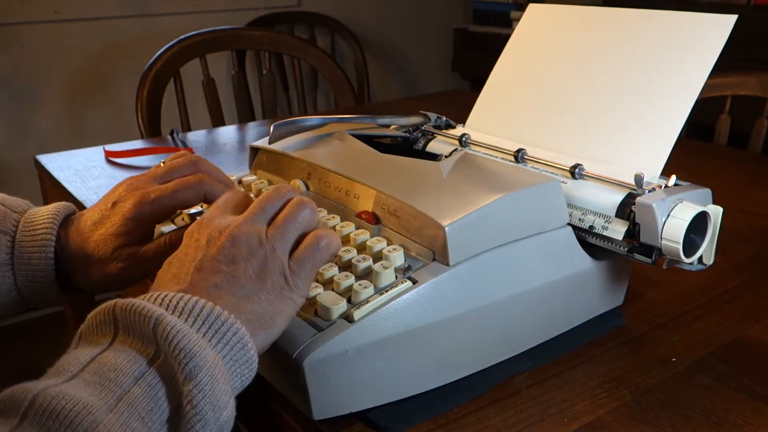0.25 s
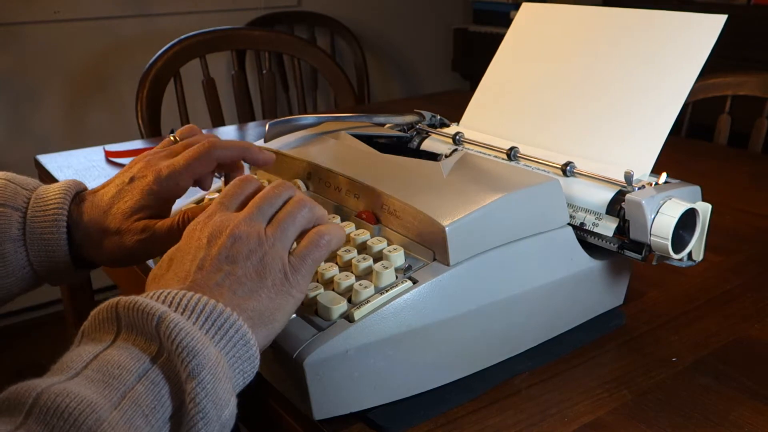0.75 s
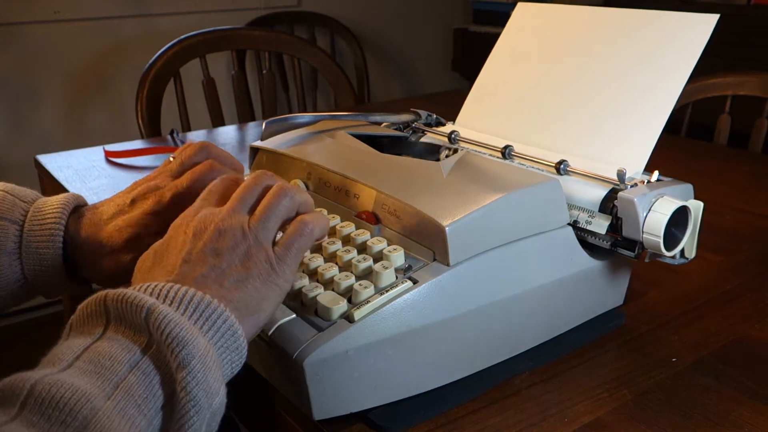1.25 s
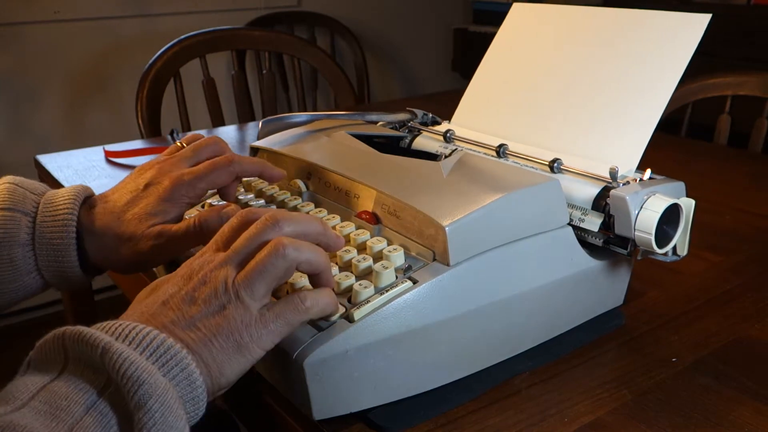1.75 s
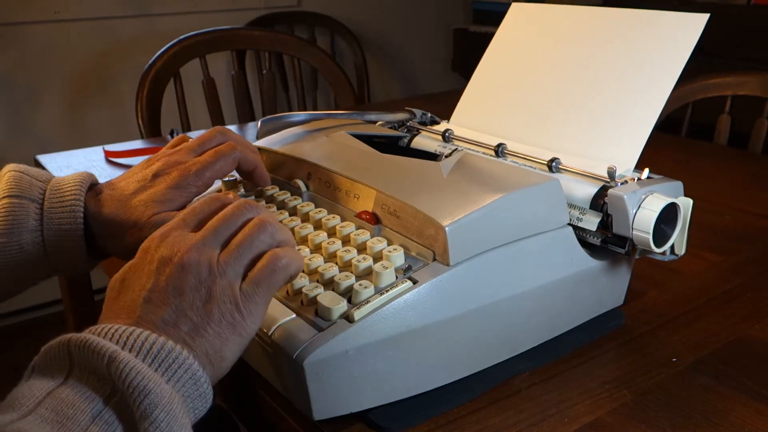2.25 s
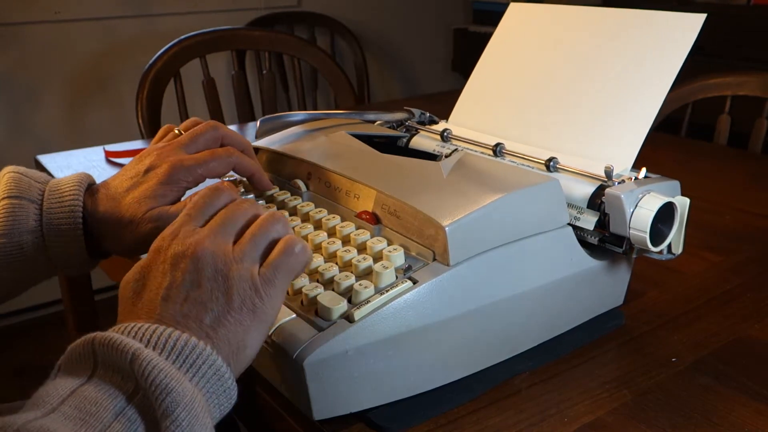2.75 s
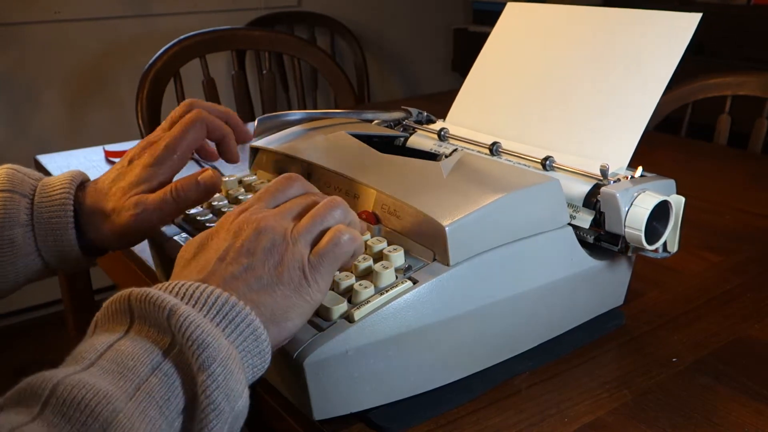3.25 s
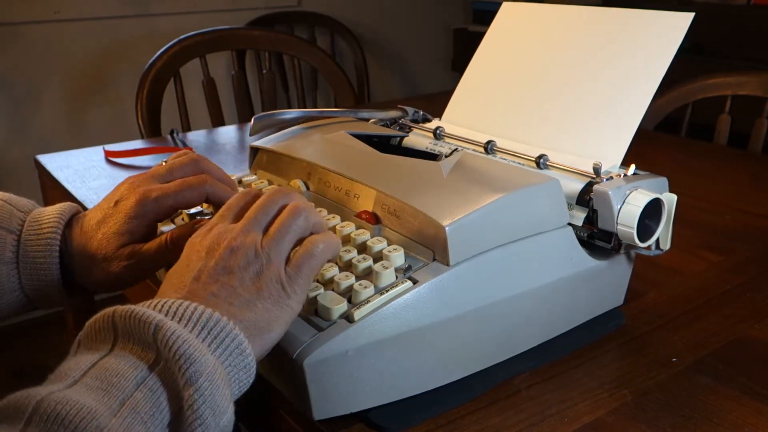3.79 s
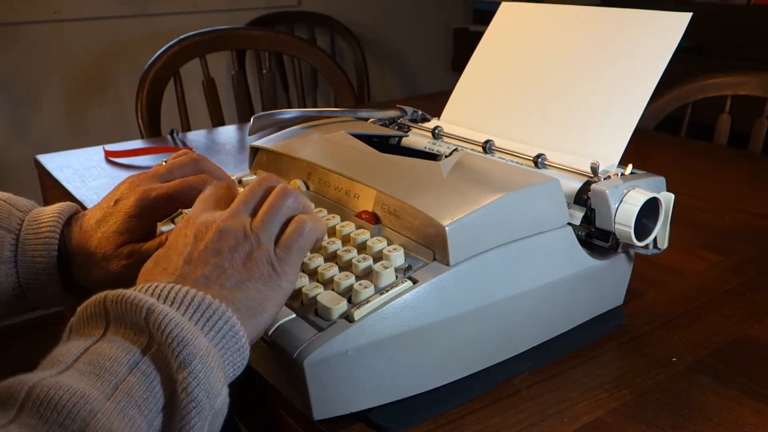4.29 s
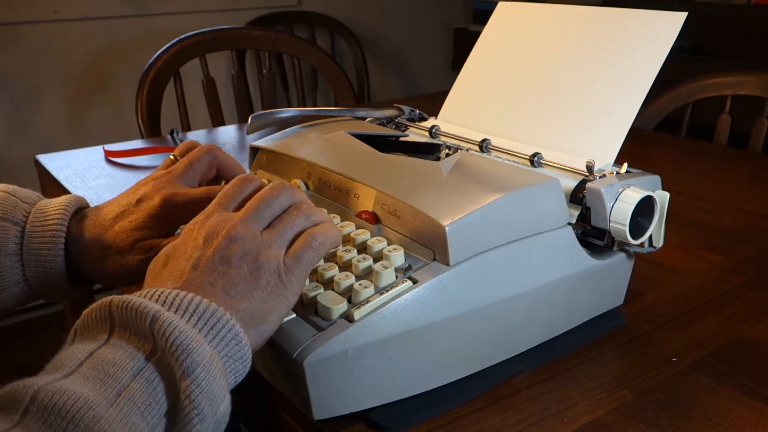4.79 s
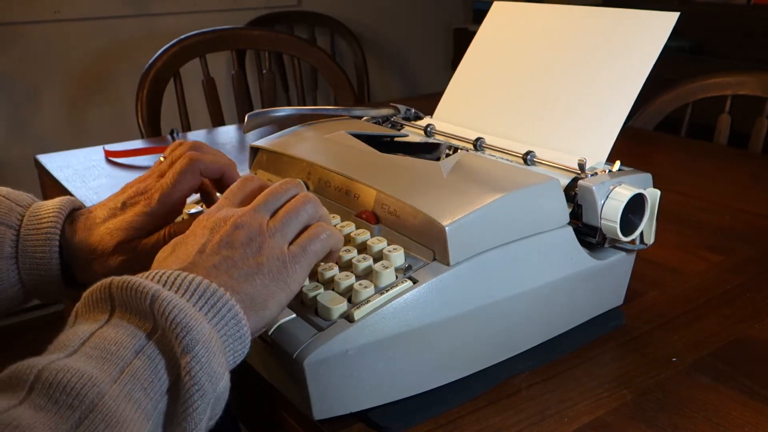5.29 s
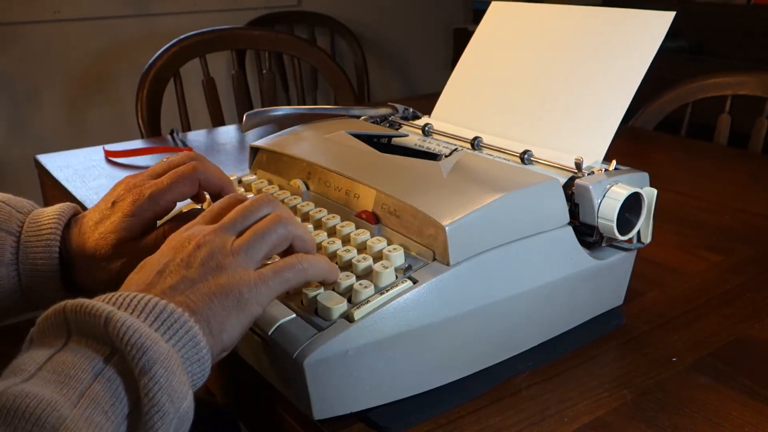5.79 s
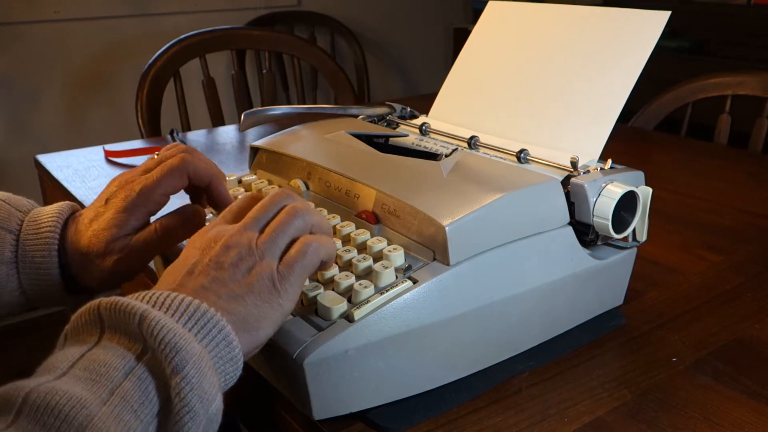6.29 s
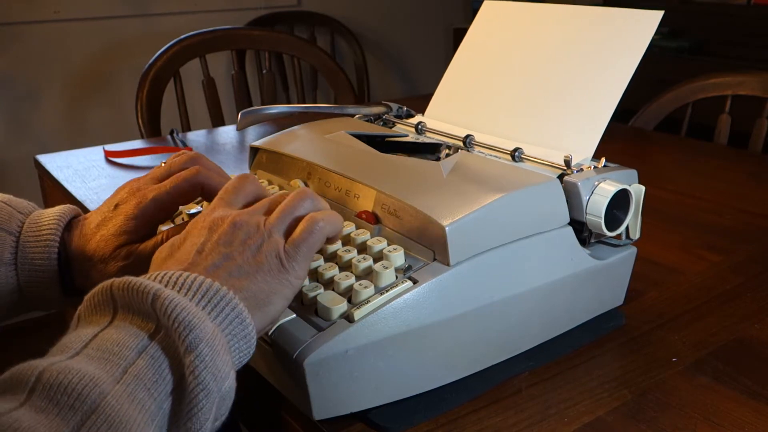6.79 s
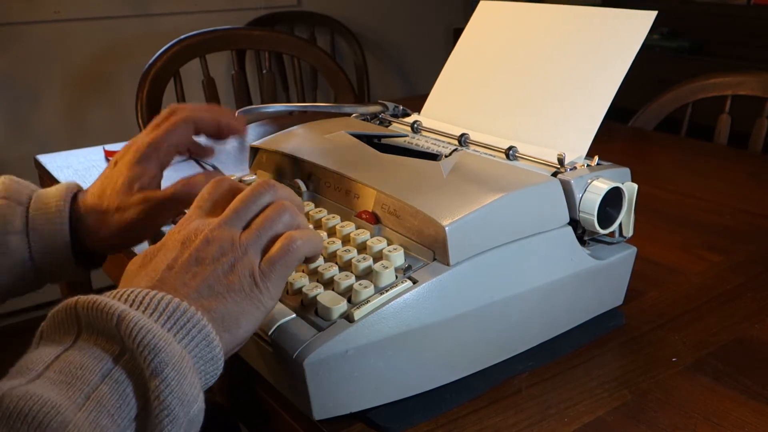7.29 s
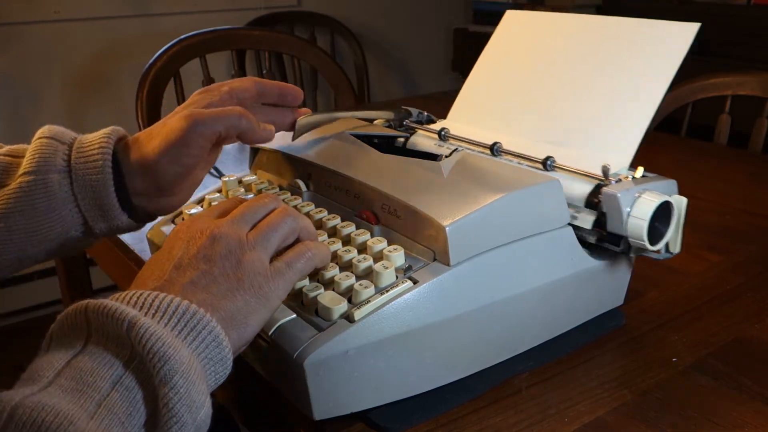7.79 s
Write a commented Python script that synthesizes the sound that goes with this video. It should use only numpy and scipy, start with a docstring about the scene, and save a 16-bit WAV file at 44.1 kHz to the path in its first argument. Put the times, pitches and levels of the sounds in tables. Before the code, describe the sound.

An electric typewriter is typed on in quick uneven runs of sharp metallic cracks and clatter, ending with a short ratcheting carriage return, over faint motor hum.

```python
"""An electric typewriter on a wooden table is typed on in quick runs; at the end the carriage is pushed back.
For each letter a cam throws a typebar: decaying tones make its crack on the platen, and shaped noise makes
the rebound and the clatter of parts falling home. Steady tones and coloured noise make the motor underneath.
A small room answers with dying noise, and the recorder's limiter ducks the loud peaks."""
import sys
import numpy as np
from scipy import signal
from scipy.fft import rfft, irfft, next_fast_len
from scipy.io import wavfile
from scipy.ndimage import uniform_filter1d, minimum_filter1d, map_coordinates

SR = 44100
rng = np.random.default_rng(int(sys.argv[2]) if len(sys.argv) > 2 else 0)


def generate_wav(sig):
    """Save sig (samples, or channels by samples) to the path in sys.argv[1] as 16-bit PCM at SR."""
    pcm = np.round(np.clip(np.atleast_2d(sig).T, -1, 1) * 32767).astype(np.int16)
    wavfile.write(sys.argv[1], SR, pcm)


N = 354563  # length of the scene in samples

# Event levels are relative: each function adds its own offset, and colouring shapes them further.
# letters, thrown much alike by the motor: (crack on the platen [s], strength [dB])
LETTER_STRIKES = [(-0.045, 6), (0.055, 3), (0.3397, 3), (0.5519, 5), (0.6299, 2.5), (0.717, 4),
                  (1.0855, 4.5), (1.1623, 4.5), (1.2909, 2), (1.4005, 4), (1.8799, 2), (2.344, 1),
                  (2.8633, 0.5), (3.1445, 4), (3.3872, 3.5), (3.5375, 3.5), (4.152, 2), (4.3844, 3.5),
                  (4.8227, 3), (4.9002, 5), (4.998, 4), (5.3037, 2.5), (5.4215, 3.5), (6.0339, -0.5),
                  (6.1454, 3.5), (6.546, 2.5), (6.6429, 3.5), (6.8239, 3.5), (7.005, 4), (7.22, 1.5)]
# carriage step and typebar falling home after each letter: (time after crack [s], level [dB], ring level [dB])
CLATTER_CONTACTS = [(.0145, -15.5, -14.5), (.028, -23, -31), (.040, -7, -17), (.053, -9.5, -9),
                    (.064, -13.5, -6.5)]
# space bar strokes: (time [s], level [dB], time until the bar comes back up [s])
SPACE_STROKES = [(0.183, -14.5, 0.081), (0.858, -15, 0.069), (1.551, -15, 0.084), (3.769, -15, 0.072),
                 (4.544, -15, 0.082), (6.316, -13.5, 0.095)]
# heavy knocks of shift and carriage: (time [s], level [dB], housing level [dB], table thump level [dB]);
# the last two are counted from the first level
HEAVY_KNOCKS = [(1.727, -4.5, -16, -41), (1.761, -3, -15.5, -29), (2.081, -7.5, -12, -35),
                (2.092, -10.5, -14, -26), (2.129, -13.5, -7.5, -29), (2.407, -10.5, -26, -42),
                (7.563, -16.5, -34, -42), (7.623, -11.5, -33, -21), (7.636, -11.5, -26, -36),
                (7.942, -4.5, -22, -45), (7.956, -7, -15, -42)]
# light ticks of fingers and key levers: (time [s], level [dB])
LIGHT_TICKS = [(0.504, -22.5), (1.039, -21), (1.72, -23), (2.0705, -24), (2.827, -35), (3.7492, -21.5),
               (4.105, -27), (4.7748, -23), (5.254, -24), (5.7933, -41), (5.904, -45), (5.983, -23.5),
               (6.2968, -24), (7.531, -30.5), (7.5426, -36), (7.557, -25), (7.616, -23), (7.7366, -23)]

# tones of a type slug on the platen, before random detuning: (frequency [Hz], level [dB], 60 dB decay [s])
SLUG_TONES = [(2250, -3, .009), (2850, 0, .010), (3700, -3, .008), (4900, -6, .006), (5900, -3, .007),
              (7250, -4, .007), (9900, -12, .005)]
# tones of the steel frame and its springs: (frequency [Hz], level [dB], 60 dB decay [s])
FRAME_TONES = [(400, -9, 0.48), (693, -12.5, 0.19), (828.5, -5, 0.21), (880, -14, 0.92), (1217, -4.5, 0.27),
               (2120, -6.5, 0.26), (2440, -6, 0.28), (2755, -7, 0.42), (3330, -17, 0.096),
               (3280, -5.5, 0.21), (4380, -7, 0.32), (4620, -11, 0.22), (4880, -15, 0.26), (5900, -11, .22),
               (7200, -21, 0.33), (8000, -11, 0.4)]

# Colours: relative spectra, evened out in power when used.
# the part that lets the carriage step: (frequency [Hz], level per Hz [dB])
ESCAPEMENT_COLOUR = [(100, -33), (350, -29.5), (500, -4), (850, -7.5), (1400, -7), (2600, -7.5),
                     (3250, 2.5), (3800, -8.5), (7000, -9.5), (11000, -22.5)]
# table thump and rail rumble: (frequency [Hz], level per Hz [dB])
THUMP_COLOUR = [(40, -20), (100, -20), (170, 3), (300, -6), (600, -15), (2000, -40)]
# typebar rebounding in its guide: (frequency [Hz], level per Hz [dB])
REBOUND_COLOUR = [(300, -26), (1500, 1), (2500, -19), (4000, 5.5), (6000, 8), (8500, 4.5), (11000, -10)]
# cam and its moving parts: (frequency [Hz], level per Hz [dB])
CAM_COLOUR = [(35, -46), (60, -16), (222, -17.5), (592, -4), (753, -4.5), (896, 5), (1920, -3.5), (3390, 2),
              (4400, -2), (5360, 1.5), (6520, -3), (8110, -4), (9440, -7), (10300, -1.5), (11000, -8.5),
              (14300, -7), (22000, -120)]
# steel of the typebasket and linkage: (frequency [Hz], level per Hz [dB])
STEEL_COLOUR = [(35, -83), (60, -40), (132, -19), (253, -38), (466, -3.5), (736, -32.5), (821, -1),
                (1070, -10), (1190, -12), (1550, -4), (2500, -3), (3170, 1), (3950, -2), (6380, -2.5),
                (11000, -9.5), (14300, -108), (22000, -120)]
# space bar: (frequency [Hz], level per Hz [dB])
BAR_COLOUR = [(35, -64), (60, -66), (118, -15), (259, -27.5), (531, -8.5), (619, -39), (839, -2.5),
              (1090, -9.5), (1920, -11), (2720, -8), (3170, -4.5), (4700, -10), (5360, -6.5), (7430, -11.5),
              (11000, -9), (14300, -43), (22000, -120)]
# heavy carriage and shift parts: (frequency [Hz], level per Hz [dB])
CARRIAGE_COLOUR = [(59, -65), (100, -30.5), (853, -1.5), (1170, -6.5), (1600, -0.5), (2620, -2), (2890, 1),
                   (4200, -2.5), (5750, -2.5), (10400, -7.5), (11000, -7.5), (14300, -28), (22000, -120)]
# rack teeth and key levers: (frequency [Hz], level per Hz [dB])
RATCHET_COLOUR = [(59, -89), (100, -36), (301, -20), (482, -11), (532, -16), (905, -4), (2150, -11),
                  (3590, -2), (4630, -9), (5420, -3), (11000, -7), (14300, -76), (22000, -120)]
# housing: (frequency [Hz], level per Hz [dB])
BODY_COLOUR = [(40, -50), (100, -20.5), (170, 1), (280, -18.5), (500, -1), (850, -4), (1400, -2.5),
               (3000, -13)]
# whirr of the power roller: (frequency [Hz], level per Hz [dB])
WHIRR_COLOUR = [(18, -40), (30, -17), (65, -22), (91, -16), (129, -5.5), (173, -8.5), (611, -3), (709, 0),
                (782, -1), (1520, -8.5), (1950, -2.5), (2500, -14), (6710, -12.5), (9030, -15.5),
                (11000, -18), (14300, -74), (22000, -120)]
# rub of the belt: (frequency [Hz], level per Hz [dB])
BELT_COLOUR = [(1300, -40), (1750, -6), (1950, 4), (2250, -40), (3000, -5), (3600, -32), (8200, -35),
               (9100, -5), (9700, -26)]

# hum of the idling motor, around which each tone wavers: (frequency [Hz], rms level [dB])
HUM_TONES = [(120, -70.5), (480, -76), (720, -62.5), (840, -73), (959, -71), (1200, -78), (1908, -73)]
# how long the room rings: (frequency [Hz], 60 dB decay [s])
ROOM_DECAY = [(120, 0.46), (500, 0.34), (1500, 0.3), (3500, 0.3), (7000, 0.23), (11000, 0.21)]
# stereo width: (frequency [Hz], gain of the side signal [dB])
SIDE_GAIN = [(100, -21), (500, -13.5), (1000, -11.5), (2000, -8), (4000, -6), (8000, 0)]
# stereo balance: (frequency [Hz], left gain minus right gain [dB])
LEFT_LEAN = [(500, -0.2), (1200, -0.2), (2200, -2), (4000, -1.5), (8000, 0.5), (11000, -0.5)]

TOP_HZ = 11120  # top of the sound band
CRACK_DB = 1.5  # peak of the slug's crack at strength 0, before its bass is removed
THROW_S, CATCH_DB = .0322, -25  # the cam catches the roller this long before the crack, at this level
RETURN_START_S, RETURN_STOP_S, PUSH_S = 7.68, 7.93, .065  # carriage return; time to gather speed
TEETH_PER_S, RETURN_DB = 240, -29.5  # rack teeth and their level at full speed


def amp(db):
    """Turn decibels into a gain."""
    return 10 ** (np.asarray(db) / 20)


def unit(x):
    """Scale to an rms of 1."""
    return x / np.sqrt(np.mean(x ** 2) + 1e-20)


def along(points, hz):
    """Read (frequency, value) points on a logarithmic frequency axis."""
    point_hz, values = np.transpose(points)
    return np.interp(np.log(hz + 1), np.log(point_hz), values)


def filtered(x, response):
    """Multiply the spectrum of x by a response that depends on frequency."""
    size = next_fast_len(N + SR // 2)
    gain = response(np.fft.rfftfreq(size, 1 / SR))
    return irfft(rfft(x, size) * gain, size)[..., :N]


def coloured(x, spectrum, size=4096):
    """Give a sound a colour without smearing it backwards, keeping the power of white noise in the band."""
    hz = np.fft.rfftfreq(size, 1 / SR)
    gain = amp(along(spectrum, hz))
    gain_rms = np.sqrt(np.mean(gain ** 2 * (hz < TOP_HZ)))
    # folding the cepstrum forward makes the filter react only after its input
    cepstrum = irfft(np.log(gain / gain_rms))
    cepstrum[1:size // 2] *= 2
    cepstrum[size // 2 + 1:] = 0
    impulse = irfft(np.exp(rfft(cepstrum)))
    return signal.fftconvolve(x, impulse[None], axes=1)[:, :N]


def add(track, s, sound):
    """Mix a sound into a track at time s, cutting off what lies outside it."""
    start = round(s * SR)
    part = sound[..., max(-start, 0):max(N - start, 0)]
    begin = max(start, 0)
    track[..., begin:begin + part.shape[-1]] += part


def contact(db, ring_db, crack_t60, ring_t60, attack=.0001, rattle_db=3):
    """Mid and side noise of one metal contact: a short crack, then loose parts rattling out (times in s)."""
    t = np.arange(SR // 4) / SR
    knots = np.arange(250) / 1000  # a new rattle strength every millisecond
    rattle = unit(amp(rattle_db * np.interp(t, knots, rng.standard_normal(len(knots)))))
    crack = amp(-60 * t / crack_t60)
    ring = rattle * amp(ring_db - 60 * t / ring_t60)
    envelope = (crack + ring) * (1 - np.exp(-t / attack))
    noise = rng.standard_normal((2, len(t))) * amp([[0], [-4]])  # side 4 dB below mid
    return amp(db) * envelope * noise


def motor(whirr_db=-57, belt_db=-63.5, flutter_db=3, waver_db=3.0):
    """Mains hum from wavering tones, with noise for the roller's whirr and a belt that rubs unevenly."""
    t = np.arange(N) / SR

    def waver(per_s):
        """Smooth random swells, with this many random points a second."""
        return map_coordinates(rng.standard_normal(10 * per_s), [t * per_s])

    hum = np.zeros(N)
    for hz, db in HUM_TONES:
        level = np.sqrt(2) * amp(db + waver_db * waver(6))  # root 2 turns rms into peak
        hum += level * np.sin(2 * np.pi * (hz * t + rng.random()))
    whirr = amp(whirr_db) * coloured(rng.standard_normal((2, N)), WHIRR_COLOUR)
    belt = amp(belt_db + flutter_db * waver(22)) * coloured(rng.standard_normal((2, N)), BELT_COLOUR)
    return hum * np.array([[1], [0]]) + whirr + belt  # hum in mid only


def cams(ribbon_s=0.012, trip_s=0.0055):
    """A cam bites the power roller and swings the typebar, which trips the escapement just before landing."""
    track = np.zeros((2, N))
    for s, _ in LETTER_STRIKES:
        catch = contact(CATCH_DB, ring_db=-1, crack_t60=0.0046, ring_t60=0.37, attack=0.0027)
        ribbon_lift = contact(-29.5, ring_db=-1.0, crack_t60=0.033, ring_t60=0.064, attack=0.0015)
        trip = contact(-25.5, ring_db=-3, crack_t60=0.016, ring_t60=0.041)
        add(track, s - THROW_S, catch)
        add(track, s - ribbon_s, ribbon_lift)
        add(track, s - trip_s, trip)
    return coloured(track, CAM_COLOUR)


def slugs(table_delay=.0007, table_db=6.0, rebound=0.0047, rebound_db=-7.0):
    """The slug cracks on the platen, the table top mirrors it at once, and the typebar rebounds in its guide."""
    track, bounces = np.zeros((2, N)), np.zeros((2, N))
    t = np.arange(SR // 50) / SR
    for s, db in LETTER_STRIKES:
        crack = np.zeros(len(t))
        for hz, level, t60 in SLUG_TONES:
            fade = amp(level + rng.normal(0, 2.7) - 60 * t / t60)
            crack += fade * np.sin(2 * np.pi * (hz * rng.normal(1, 0.054) * t + rng.random()))
        delay = table_delay * rng.uniform(.7, 1.3)
        crack = crack + amp(table_db) * np.interp(t - delay, t, crack, left=0)
        crack = crack / np.abs(crack).max() * amp(CRACK_DB + db)
        add(track, s, crack * np.array([[1], [-.15]]))  # mostly mid, a little reversed side
        add(bounces, s + rebound, contact(rebound_db, ring_db=-18, crack_t60=.007, ring_t60=.04))
    too_small_for_bass = signal.butter(5, 1750, "high", fs=SR, output="sos")
    return signal.sosfilt(too_small_for_bass, track) + coloured(bounces, REBOUND_COLOUR)


def clatter(scatter=.0016, spread=.002, uneven_db=2.1):
    """The blow spreads through typebasket and housing; then the linkage falls back in a string of contacts."""
    steel, body = np.zeros((2, N)), np.zeros((2, N))
    for s, strength_db in LETTER_STRIKES:
        basket = contact(strength_db - 12.5, ring_db=-3, crack_t60=0.011, ring_t60=0.12, attack=0.0024)
        housing = contact(-37, ring_db=-10.0, crack_t60=0.011, ring_t60=0.095, attack=0.0033)
        bar_on_rest = contact(strength_db - 39.0, ring_db=-0.5, crack_t60=0.0077, ring_t60=0.29)
        add(steel, s + spread, basket)
        add(body, s + spread, housing)
        add(body, s + .05, bar_on_rest)
        for after, db, ring_db in CLATTER_CONTACTS:
            late = after + scatter * np.sqrt(after / .02) * rng.normal()  # later contacts scatter more
            force_db = strength_db + db + uneven_db * rng.normal()
            add(steel, s + late, contact(force_db - 8.0, ring_db, crack_t60=0.0021, ring_t60=0.041))
    return coloured(steel, STEEL_COLOUR) + coloured(body, BODY_COLOUR)


def frame(x, ring_db=11.5):
    """Every contact passed in sets the same steel tones ringing."""
    t = np.arange(SR // 2) / SR
    ring = np.zeros(len(t))
    for hz, db, t60 in FRAME_TONES:
        even_out = np.log(1e6) / (t60 * SR)  # keeps long tones from building up more than short ones
        ring += amp(db - 60 * t / t60) * even_out * np.sin(2 * np.pi * hz * t)
    return amp(ring_db) * signal.fftconvolve(x, ring[None], axes=1)[:, :N]


def blows(blow_db=7.5):
    """Platen and open basket throw one broad steel-coloured pulse into the room at each crack."""
    track = np.zeros((1, N))
    for s, db in LETTER_STRIKES:
        add(track, s, amp([db + blow_db]))  # a single sample
    return coloured(track, STEEL_COLOUR)


def room(x, size=256):
    """The room stores the energy of each band and lets it die away as diffuse noise in mid and side."""
    hz, _, z = signal.stft(x[0], SR, nperseg=size)
    keep = amp(-60 * size / SR / along(ROOM_DECAY, hz))  # energy left after one half-overlapping step
    energy = np.abs(z) ** 2
    stored = np.array([signal.lfilter([0, 0, 1 - k], [1, -k], band) for k, band in zip(keep, energy)])
    diffuse = signal.stft(rng.standard_normal((2, N)), SR, nperseg=size)[2]
    return signal.istft(np.sqrt(stored) * diffuse / diffuse.std(), SR, nperseg=size)[1][:, :N]


def space_bar(step=0.045, stop=0.041):
    """The bar goes down, the escapement rings as the carriage steps and stops, and the bar comes back up."""
    bar, pawl = np.zeros((2, N)), np.zeros((2, N))
    for s, db, release in SPACE_STROKES:
        add(bar, s, contact(db - 10.5, ring_db=-1.0, crack_t60=0.025, ring_t60=0.29))
        add(pawl, s + step, contact(-32.0, ring_db=-0.5, crack_t60=0.066, ring_t60=0.073))
        add(pawl, s + stop, contact(-26.0, ring_db=-0.5, crack_t60=0.013, ring_t60=0.17))
        add(bar, s + release, contact(-24.5, ring_db=1.0, crack_t60=0.035, ring_t60=0.048))
    return coloured(bar, BAR_COLOUR) + coloured(pawl, ESCAPEMENT_COLOUR)


def ticks(tick_db=-9):
    """Fingers land on the key tops and take up the slack of the levers."""
    track = np.zeros((2, N))
    for s, db in LIGHT_TICKS:
        add(track, s, contact(db + tick_db, ring_db=-9, crack_t60=.014, ring_t60=.13))
    return coloured(track, RATCHET_COLOUR)


def knocks():
    """Heavy parts meet their stops, knock the housing and thump the table."""
    steel, body, table = np.zeros((3, 2, N))
    for s, db, body_db, thump_db in HEAVY_KNOCKS:
        add(steel, s, contact(db - 11.0, ring_db=-4.0, crack_t60=0.018, ring_t60=0.096, attack=0.00095))
        add(body, s, contact(db + body_db - 14.5, ring_db=0.5, crack_t60=.02, ring_t60=0.32))
        add(table, s, contact(db + thump_db - 18, ring_db=-1, crack_t60=.03, ring_t60=0.23, attack=0.004))
    return coloured(steel, CARRIAGE_COLOUR) + coloured(body, BODY_COLOUR) + coloured(table, THUMP_COLOUR)


def ratchet(pawl_db=-10, rumble_db=-29, uneven_db=2.5):
    """The carriage gathers speed; the pawl skips over the rack faster and harder, and the rails rumble."""
    track = np.zeros((2, N))
    t = np.arange(RETURN_START_S, RETURN_STOP_S, 1 / SR)
    speed = 1 - np.exp(-((t - RETURN_START_S) / PUSH_S) ** 2)  # 1 is full speed
    teeth_passed = np.floor(np.cumsum(speed) * TEETH_PER_S / SR)
    teeth = np.flatnonzero(np.diff(teeth_passed))
    for s, v in zip(t[teeth], speed[teeth]):
        tooth_db = RETURN_DB + rng.normal(0, uneven_db)
        tooth = contact(tooth_db, ring_db=-5, crack_t60=0.007, ring_t60=0.081, attack=0.00075)
        add(track, s + rng.normal(0, .0005), np.sqrt(v) * tooth)
    pawl = amp(pawl_db) * coloured(track, ESCAPEMENT_COLOUR)
    rumble = amp(rumble_db) * coloured(track, THUMP_COLOUR)
    return coloured(track, RATCHET_COLOUR) + pawl + rumble


def band_limit(hz):
    """Steep low-pass gain at the top of the band."""
    return 1 / np.sqrt(1 + (hz / TOP_HZ) ** 260)


def scene(room_db=-3):
    """Add up the machine, its room and its motor, then turn mid and side into left and right."""
    linkage = cams() + clatter() + space_bar() + ticks() + knocks() + ratchet()
    linkage = linkage + frame(linkage)
    echoes = amp(room_db) * room(linkage + blows())
    mid, side = linkage + slugs() + echoes + motor()
    side = filtered(side, lambda hz: amp(along(SIDE_GAIN, hz)))
    left_right = np.array([mid + side, mid - side])

    def balance(hz):
        """Share the lean equally between left and right."""
        return amp(np.outer([.5, -.5], along(LEFT_LEAN, hz))) * band_limit(hz)

    return filtered(left_right, balance)


def limited(x, ceiling_db=-4, ahead=0.00226, release_db_per_s=330):
    """A look-ahead limiter: the gain drops just before a peak and climbs back steadily."""
    over = np.maximum(20 * np.log10(np.abs(x).max(axis=0) + 1e-9) - ceiling_db, 0)
    over = -minimum_filter1d(-over, max(int(2 * ahead * SR), 2))  # hold each peak before and after it
    climb = release_db_per_s * np.arange(N) / SR
    cut_db = np.maximum.accumulate(over + climb) - climb
    return x * amp(-uniform_filter1d(cut_db, size=16))


def record(dry, low_cut_hz=70):
    """The recorder thins the deep bass, limits the peaks and cuts steeply above its band."""
    thinned = filtered(dry, lambda hz: 1j * hz / (low_cut_hz + 1j * hz))
    return filtered(limited(thinned), band_limit)


dry = scene()
out = record(dry)
generate_wav(out)
```